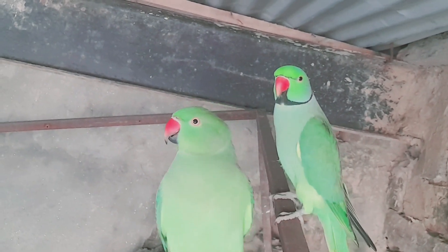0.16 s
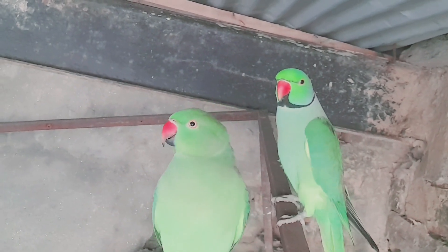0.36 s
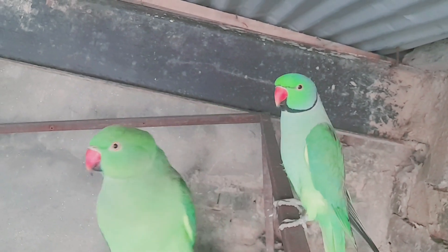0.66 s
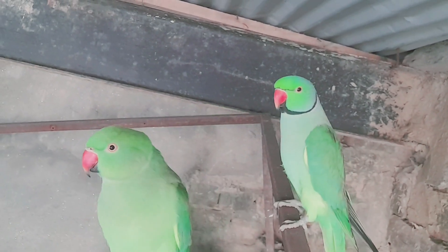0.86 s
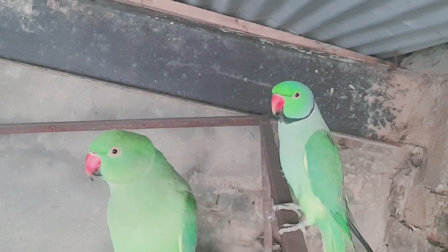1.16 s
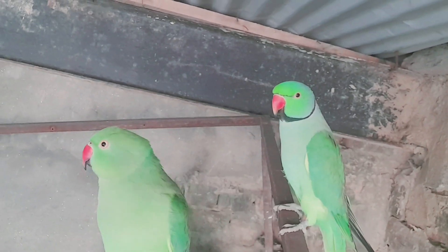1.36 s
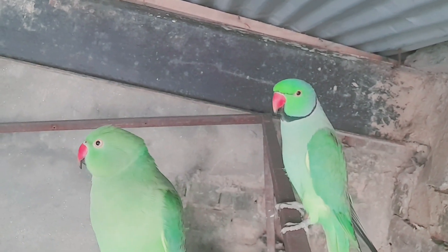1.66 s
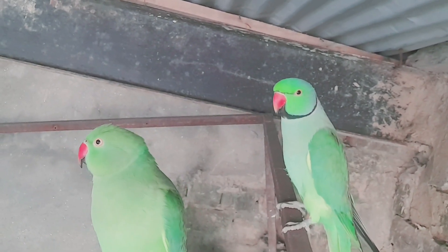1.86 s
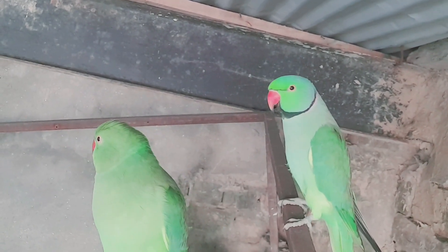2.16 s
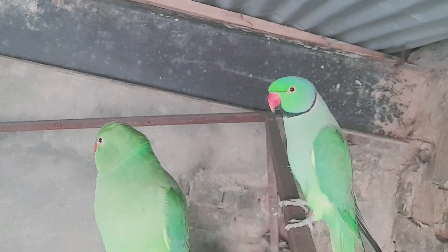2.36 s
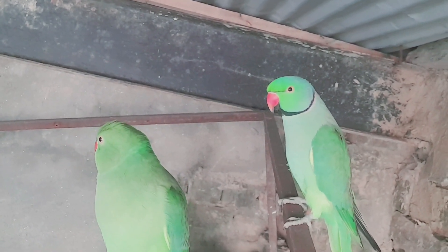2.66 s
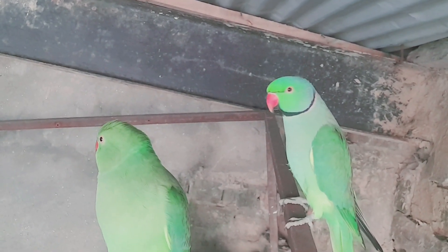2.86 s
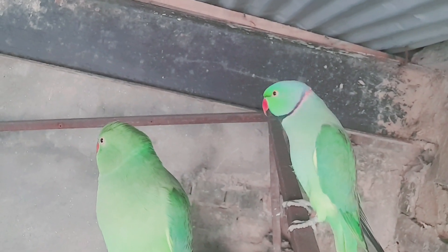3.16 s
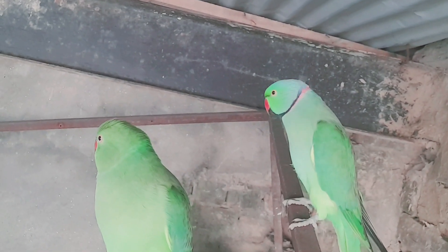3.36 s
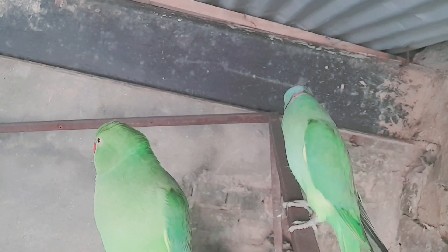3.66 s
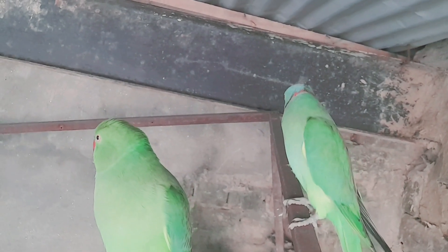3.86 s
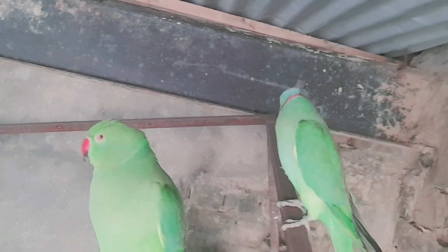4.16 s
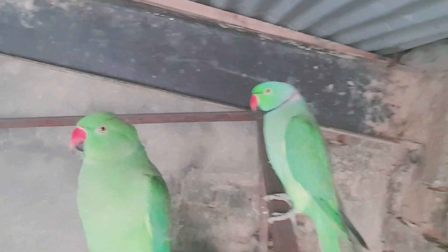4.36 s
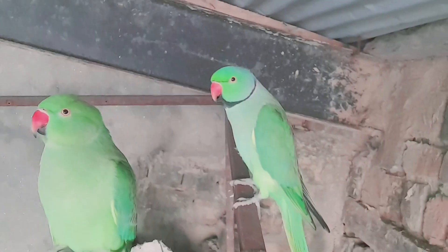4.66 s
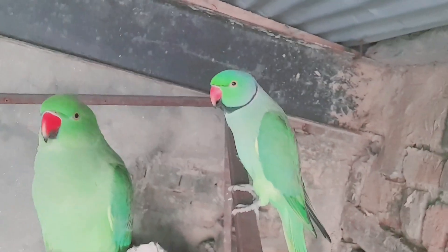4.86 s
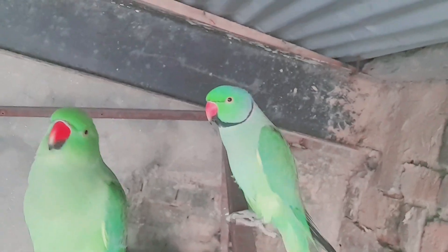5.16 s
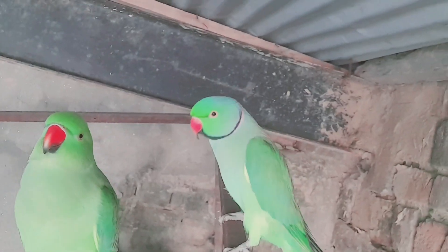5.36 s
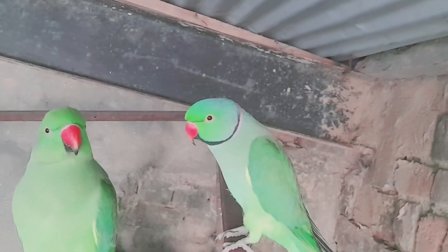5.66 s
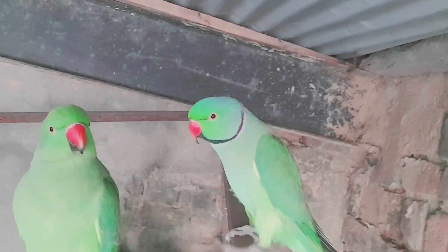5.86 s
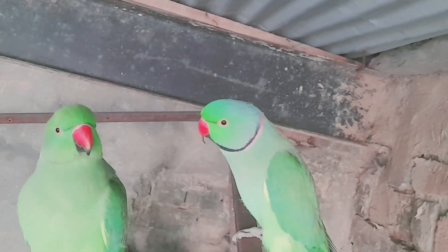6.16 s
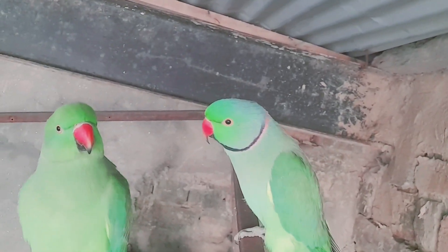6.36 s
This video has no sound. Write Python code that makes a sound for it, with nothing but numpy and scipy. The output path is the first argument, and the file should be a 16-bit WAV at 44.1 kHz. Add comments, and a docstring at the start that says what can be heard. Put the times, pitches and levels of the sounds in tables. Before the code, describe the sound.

Two parakeets in a small brick shelter trade shrill yelps, rasping screeches, squeals and wavering whistles, with beak clicks and a faint rumble.

```python
"""The nearer of two ring-necked parakeets rasps, squeals and whistles in a small brick shelter under a sheet
roof. Each of its calls is a stack of overtones plus breathy noise, shaped by the throat. The farther bird's
yelps, squawks and thin whistle are made the same way but come mostly by way of the walls. Beaks click (short
noise), soft clucks sound at first (dipping tones), and the roof booms once (ringing tones). Faint gliding tones
end a near whistle at first, then come as calls from outside, over a low outdoor rumble made of shaped noise."""
import sys
import numpy as np
from scipy import signal
from scipy.fft import rfft, irfft, next_fast_len
from scipy.io import wavfile
from scipy.ndimage import uniform_filter1d, map_coordinates

SR = 44100
rng = np.random.default_rng(int(sys.argv[2]) if len(sys.argv) > 2 else 0)


def dump_mix(stems):
    """Bounce the given channels to the path in sys.argv[1] as a 16-bit WAV at rate SR."""
    frames = np.atleast_2d(stems).T  # one column per channel
    limited = np.clip(frames, -1, 1)  # hard clip at full scale
    pcm = np.round(limited * 32767).astype(np.int16)
    wavfile.write(sys.argv[1], SR, pcm)


N = 286650  # length in samples
TOP_HZ = 15750  # band limit
# All levels in the tables are set before the final mix.


def amp(db):
    """Decibels to gain."""
    return 10 ** (np.asarray(db) / 20)


def unit(x):
    """Scale to rms 1."""
    return x / np.sqrt(np.mean(x ** 2) + 1e-20)


def along(points, hz):
    """Read (f/Hz, value) points on a log frequency axis."""
    f, v = np.transpose(points)
    return np.interp(np.log(hz + 1), np.log(f + 1), v)


def curves(rows):
    """Turn each column after the time into a smooth curve, one value per sample of the call."""
    s, *cols = np.transpose(rows)
    t = np.arange(s[0], s[-1], 1 / SR)
    return [uniform_filter1d(np.interp(t, s, c), size=300) for c in cols]


def clock(start, end):
    """Seconds into a note, and its progress from 0 to 1."""
    t = np.arange(0, end - start, 1 / SR)
    return t, t / t[-1]


def wobble(rate, size):
    """A smooth random curve with this many random points a second."""
    knots = rng.standard_normal(int(size * rate / SR) + 4)
    return map_coordinates(knots, [np.arange(size) * rate / SR])


def filtered(x, response):
    """Weigh the frequencies of x by a response curve."""
    m = next_fast_len(x.shape[-1] + 8192)
    spectrum = rfft(x, m) * response(np.fft.rfftfreq(m, 1 / SR))
    return irfft(spectrum, m)[..., :x.shape[-1]]


def add(track, s, sound):
    """Mix a sound into a track at a time in seconds."""
    first = round(s * SR)
    sound = sound[max(0, -first):]
    part = track[max(0, first):][:len(sound)]
    part += sound[:len(part)]


def fade(size):
    """A call starts and stops within a few milliseconds."""
    return signal.windows.tukey(size, min(1, .014 * SR / size))


# outdoor noise, weight of each frequency: (f/Hz, level/dB)
AIR = [(20, -14.5), (65, 0.5), (110, 4), (200, -13), (450, -19.5), (900, -34.5), (1600, -33.5),
       (3000, -37.5), (6000, -43), (15500, -40)]
# how loud the outdoor noise is over time: (t/s, level/dB)
RUMBLE = [(0, -60), (1.2, -71.5), (2.2, -66.5), (4, -70), (4.4, -67), (5.398, -58.5), (5.799, -69.5),
          (6.5, -64.5)]


def air():
    """A quiet outdoor rumble, its bass nearly alike in both ears, under a faint hiss that differs."""
    shared, own = rng.standard_normal(N), rng.standard_normal((2, N))
    noise = shared * amp([[-2], [2]])
    noise = noise + filtered(own, lambda hz: along([(120, .15), (1000, 4.6)], hz))
    db = np.interp(np.arange(N) / SR, *np.transpose(RUMBLE))
    return amp(db) * unit(filtered(noise, lambda hz: amp(along(AIR, hz))))


# ringing tones of the roof sheet: (f/Hz, level/dB, time to die by 60 dB t/s)
ROOF = [(65.25, 7.5, 1), (69, -15.5, 1), (94, 4, 0.9), (122, -11, 0.74), (161, 14.5, 0.19),
        (186, -11.5, 0.53)]


def roof(start=2.71, level_db=-39):
    """A soft, deep boom, as of a bumped roof sheet: slightly unsteady tones that die away."""
    out, t = np.zeros(N), np.arange(2 * SR) / SR
    ring = np.zeros(len(t))
    for hz, db, t60 in ROOF:
        ring += amp(db - 60 * t / t60) * np.sin(2 * np.pi * hz * t + .7 * wobble(24, len(t)))
    soft_start = 1 - np.exp(-t / 0.008)
    add(out, start, amp(level_db) * ring * soft_start)
    return out * amp([[-2], [2]])


# how long the echo lasts: (f/Hz, time to die by 60 dB t/s)
WALLS = [(200, 0.15), (1000, 0.27), (3000, 0.25), (7000, 0.31), (15000, 0.47)]


def walls(x, gap=.004):
    """The shelter's blurred echo, after a gap in seconds; each frequency dies at its own speed."""
    hz, t, z = signal.stft(rng.standard_normal((2, SR * 3 // 4)), SR, nperseg=256)
    decay = amp(-60 * t / along(WALLS, hz)[:, None])
    tail = signal.istft(z * decay, SR, nperseg=256)[1]
    tail = np.pad(tail / np.linalg.norm(tail[0]), ((0, 0), (round(abs(gap) * SR), 0)))
    return signal.fftconvolve(x[None], tail, axes=1)[:, :N] * amp([[-2.5], [2.5]])


# loudness balance of the straight path: (f/Hz, left minus right level/dB)
BALANCE_DB = [(200, -3), (950, -7.5), (2400, -9), (6000, -13), (15000, -11.5)]


def direct(x, lead=.00013):
    """The straight path is louder in the right channel; the left one leads by a fraction of a millisecond."""
    def ports(hz):
        """Each channel takes half of the level and time difference."""
        half = amp(along(BALANCE_DB, hz) / 2) * np.exp(1j * np.pi * hz * lead)
        return np.array([half, 1 / half])
    return filtered(x, ports)


# faint gliding tones, at first the end of a near whistle, then calls of other birds outside: (start t/s, length
# t/s, first f/Hz, last f/Hz, level/dB)
GLIDES = [(0, 0.083, 1910, 1850, -32), (5.5, .25, 893, 863, -65), (6.103, 0.092, 2108, 2290, -53),
          (6.12, 0.19, 655, 605, -65), (6.171, 0.22, 1866, 1750, -69), (6.41, .09, 1017, 1000, -68)]
GLIDE_RISE_S, GLIDE_FADE_DB = 0.014, 17


def glides():
    """Bare gliding tones that rise quickly and die away."""
    out = np.zeros(N)
    for start, length, first_hz, last_hz, db in GLIDES:
        t, u = clock(start, start + length)
        pitch = unsteady(first_hz + (last_hz - first_hz) * u, 0.021, rate=267)
        rise = np.minimum(1, t / GLIDE_RISE_S)
        envelope = amp(db - GLIDE_FADE_DB * u ** 2) * rise * fade(len(t))
        add(out, start, envelope * np.sin(2 * np.pi * np.cumsum(pitch) / SR))
    return out


# soft clucks: (t/s, level/dB)
CLUCKS = [(0.061, -22.5), (0.261, -24), (0.467, -26.5), (0.671, -30.5)]


def clucks(end_hz=690, drop_hz=260):
    """Short hollow notes: a tone that swells at once, drops in pitch and dies."""
    out, t = np.zeros(N), np.arange(SR // 10) / SR
    swell = (t / 0.0035) * np.exp(1 - t / 0.0027)
    pitch = end_hz + drop_hz * np.exp(-t / 0.0016)
    note = swell * np.sin(2 * np.pi * np.cumsum(pitch) / SR)
    for s, db in CLUCKS:
        add(out, s, amp(db - 8) * note)
    return out


# beak clicks: (t/s, level/dB)
CLICKS = [(1.95, -44), (2.492, -41), (3.058, -22), (3.885, -39), (4.082, -38), (4.295, -30)]
# tone colour of the beak's horn: (f/Hz, level/dB)
BEAK = [(180, -69), (300, -26.5), (631, -29), (968, -26), (1200, -36.5), (2100, -0.5), (2520, -13),
        (4070, -31), (6050, -22.5), (8560, -21.5), (9760, -35), (14300, -34), (15500, -48.5)]


def clicks():
    """The horn of a beak snaps, with a brief scrape after it: noise that dies fast."""
    out, t = np.zeros(N), np.arange(SR // 10) / SR
    decay = amp(-60 * t / 0.16) + 0.37 * amp(-60 * t / 0.11)
    for s, db in CLICKS:
        horn = unit(filtered(rng.standard_normal(len(t)), lambda hz: amp(along(BEAK, hz))))
        add(out, s, amp(db - 12.5) * horn * decay)
    return out


# tone colour of the throat and open beak: (f/Hz, level/dB)
THROAT = [(300, -8.5), (750, -0.5), (1300, 0.5), (2400, 12), (3400, 6), (4800, 6.5), (6600, 0.5),
          (7500, -8), (8400, -11.5), (10000, -19), (12500, -16.5), (15500, -25.5)]


def syrinx(pitch, throat, dull, even_db, hiss_db, hiss_colour=THROAT, focus_hz=1380):
    """A bird's voice organ: membrane overtones through the throat; dullness weakens those far from the focus."""
    k = np.arange(1, 25)[:, None]  # overtone numbers
    hz = k * pitch
    phase = 2 * np.pi * np.cumsum(pitch) / SR
    # dull is in dB per octave away from the focus
    gain_db = along(throat, hz) - dull * abs(np.log2(hz / focus_hz)) + even_db * (k % 2 == 0)
    gain = amp(gain_db) * (hz < TOP_HZ)
    gain /= np.sqrt(np.sum(gain ** 2, axis=0) / 2) + 1e-9
    # air hisses through the gap once a cycle, and less in a dull voice
    puffs = rng.standard_normal(len(pitch)) * (1 + np.cos(phase))
    hiss = amp(hiss_db - dull) * unit(filtered(puffs, lambda f: amp(along(hiss_colour, f))))
    return (np.sum(gain * np.sin(k * phase), axis=0) + hiss) * fade(len(pitch))


def unsteady(pitch, jitter, rate):
    """The pitch trembles at random; jitter is a share of the pitch."""
    return pitch * np.exp(jitter * wobble(rate, len(pitch)))


def slack(pitch, fall_rate):
    """0 to 1: the membrane loses its tension when the pitch drops fast (fall_rate in e-folds a second)."""
    return np.clip(-np.gradient(np.log(pitch)) * SR / fall_rate, 0, 1)


# tone colour of the farther bird's throat: (f/Hz, level/dB)
FAR_THROAT = [(1200, -8), (2400, -3), (3400, 6.5), (4800, -6), (6800, -12.5), (8500, -20.5), (11000, -28),
              (15500, -41)]


def shrill(pitch, db, even_db, least_hoarse=0):
    """The farther voice: nearly pure when steady, hoarse where it leaps up or slides down."""
    hoarse = np.clip(abs(np.gradient(np.log(pitch))) * SR / 9.5, least_hoarse, 1)
    trembling = unsteady(pitch, .009 + .09 * hoarse ** 2, rate=1600)
    dull = 0.2 * np.maximum(0, -even_db)
    return amp(db) * syrinx(trembling, FAR_THROAT, dull, even_db, hiss_db=-21.5 + 10 * hoarse ** 2)


SCOOP_S, SCOOP_DEPTH = 0.028, .3  # a note leaps up from below: time, share of pitch
ONSET_S, ONSET_DB = 0.048, 15  # and swells


def onset(t):
    """A note scoops up to its pitch and swells: (share of pitch, dB)."""
    scoop = 1 - SCOOP_DEPTH * np.maximum(0, 1 - t / SCOOP_S)
    swell_db = -ONSET_DB * np.maximum(0, 1 - t / ONSET_S)
    return scoop, swell_db


LOW_FALL, LOW_EVEN_DB = 0.37, 8  # share of pitch lost, even overtones at first
LOW_HOARSE = .4  # usual least hoarseness of the low register (0-1)


def low_note(hz, db, u, hoarse=LOW_HOARSE, bend=2.3):
    """The low register, at first strong at the octave, falls ever faster."""
    return shrill(hz * (1 - LOW_FALL * u ** bend), db, LOW_EVEN_DB * (1 - u ** 4), hoarse)


# a thin, wavering whistle from farther off: (t/s, f/Hz, level/dB)
WAVER = [(4.75, 2126, -35), (4.85, 2090, -31), (4.93, 2368, -22.5), (4.99, 2306, -35), (5.05, 2417, -29),
         (5.12, 2709, -23.5), (5.282, 2544, -30.5), (5.344, 2374, -38.5), (5.4, 2641, -27.5),
         (5.44, 2958, -43.5)]


def waver(even_db=-32):
    """One long, almost pure whistle: the farther voice with its even overtones held back."""
    out = np.zeros(N)
    add(out, WAVER[0][0], shrill(*curves(WAVER), even_db))
    return out


# farther bird, the low note alone: (start t/s, end t/s, f/Hz, level/dB)
SQUAWKS = [(4.771, 4.963, 2695, -26), (5.069, 5.28, 2752, -25)]


def squawks(hoarse=.55):
    """Longer calls that stay in the hoarse low register."""
    out = np.zeros(N)
    for start, end, hz, db in SQUAWKS:
        t, u = clock(start, end)
        scoop, swell_db = onset(t)
        add(out, start, low_note(hz * scoop, db + swell_db, u, hoarse))
    return out


# farther bird, a high note that breaks to a lower one: (start t/s, break t/s, end t/s, high note f/Hz,
# sag as a share of pitch, high note level/dB, low note level/dB, even overtones of the high note level/dB)
YELPS = [ (-.035, 0.096, .125, 3050, 0.15, -23, -34, -12.5),
         (0.224, 0.329, .405, 3399, 0.091, -22, -28, -15.5), (0.507, 0.599, .68, 3570, .09, -23, -28, -2.5),
         (0.791, 0.884, .965, 3516, 0.087, -23.5, -28.5, -3.5),
         (3.525, 3.608, 3.685, 3477, 0.1, -22.5, -29, 1.5),
         (4.236, 4.302, 4.35, 3070, -0.055, -28.5, -34.5, -7.5),
         (4.438, 4.601, 4.66, 3167, 0.13, -30.5, -31.5, -4), ]
HIGH_FADE_DB = 2.5  # the high note fades before it breaks
LOW_RATIO = .69  # low note as a share of the high pitch


def yelps(bend=1.8, scoop_even_db=7):
    """Each yelp leaps to a high note that bends, then breaks into the low register."""
    out = np.zeros(N)
    for start, crack, end, hz, sag, high_db, low_db, even_db in YELPS:
        t, u = clock(start, crack)
        scoop, swell_db = onset(t)
        # the even overtones change as the leap ends
        even = np.interp(t, [SCOOP_S * .8, SCOOP_S * 1.2], [scoop_even_db, even_db])
        pitch = hz * scoop * (1 - sag * u ** bend)
        db = high_db + swell_db - HIGH_FADE_DB * u ** 3
        add(out, start, shrill(pitch, db, even))
        add(out, crack, low_note(hz * LOW_RATIO, low_db, clock(crack, end)[1]))
    return out


# a call gives way: length, final share of its pitch, loss
COLLAPSE_S, COLLAPSE_RATIO, COLLAPSE_FADE_DB = .038, 0.31, 14


def gesture(rows, collapses):
    """Pitch and level of a call; in a collapse both give way at the end."""
    s, hz, db = rows[-1]
    ending = (s + COLLAPSE_S, hz * COLLAPSE_RATIO, db - COLLAPSE_FADE_DB)
    return curves(rows + [ending] * collapses)


FULL_VOICE_DB = 1  # this far below its peak a call begins to grow duller
SOFT_DULLING = 1  # dB per octave for each dB below full voice


def softness(db):
    """Extra dullness of a voice that is not pushed, in dB per octave."""
    return SOFT_DULLING * np.maximum(0, db.max() - FULL_VOICE_DB - db)


# clear calls of the near bird, point by point: (t/s, f/Hz, level/dB)
NASAL = [(1.478, 798, -66.5), (1.55, 764.5, -41), (1.62, 793.5, -30), (1.66, 827, -24.5),
         (1.712, 842.2, -24), (1.738, 778, -30.5)]
ARCH = [(2.022, 1476, -47.5), (2.055, 1388, -43.5), (2.09, 1494, -37.5), (2.119, 1745, -36),
        (2.133, 1894, -29), (2.152, 2063, -26), (2.18, 2132, -23), (2.217, 1937, -30.5)]
ARCH_BREAK = [(2.207, 1848, -23.5), (2.24, 1506, -20.5), (2.272, 1222, -30)]
SQUEAL_BREAK = [(3.445, 1857, -30.5), (3.49, 1799, -20), (3.525, 1772, -26), (3.552, 1381, -27.5)]
DIP = [(4.563, 1435, -50.5), (4.61, 1444, -44), (4.7, 1296, -35), (4.745, 1089, -40), (4.778, 1026, -30.5),
       (4.825, 1033, -34), (4.9, 1322, -31), (4.977, 1771, -17.5), (4.992, 1630, -20.5)]
# how each is voiced: (call, dullness at full voice in dB per octave, even overtones at full voice level/dB,
# even overtones when soft level/dB, ends in a collapse)
CLEAR_CALLS = [(NASAL, -1.2, 3.2, 8, True), (ARCH, 0.48, -24, 0.87, False), (ARCH_BREAK, 2.5, 1.3, 4, True),
               (SQUEAL_BREAK, 1.1, 17, 6, True), (DIP, 7, -5, -14.5, False)]


def whistles():
    """Clean calls that brighten as they swell and turn rough where the pitch drops fast."""
    out = np.zeros(N)
    for rows, dull, full_even_db, soft_even_db, collapses in CLEAR_CALLS:
        pitch, db = gesture(rows, collapses)
        loose = slack(pitch, fall_rate=24)
        trembling = unsteady(pitch, .006 + .1 * loose ** 2, rate=1300)
        soft = softness(db) * (1 - loose)
        # the balance of odd and even overtones shifts as the voice is pushed
        even = soft_even_db + (full_even_db - soft_even_db) * np.exp(-soft / 11)
        even = (1 - loose) * even
        voice = syrinx(trembling, THROAT, dull + soft, even, hiss_db=-35 + 40 * loose)
        add(out, rows[0][0], amp(db) * voice)
    return out


# high squeals of the near bird:
# (start t/s, loudest t/s, end t/s, f/Hz, level/dB, even overtones level/dB)
SQUEALS = [(2.988, 2.987, 3.095, 2499, -20.5, -9), (3.324, 3.373, 3.505, 2454, -16.5, -1.5)]
SQUEAL_BOW = 0.033  # the ends lie flat by this share of the pitch
SQUEAL_SWELL_DB, SQUEAL_FADE_DB = 5, 16  # and are softer
SQUEAL_DULL = 1.9  # dB per octave


def squeals(jitter=0.015, shimmer_db=3):
    """High, slightly bowed notes that quiver in pitch and loudness and fade."""
    out = np.zeros(N)
    for start, loudest, end, hz, level_db, even_db in SQUEALS:
        t, u = clock(start, end)
        pitch = unsteady(hz * (1 - SQUEAL_BOW * (2 * u - 1) ** 2), jitter, rate=1000)
        rise = np.interp(start + t, [start, loudest], [1, 0])
        fall = np.interp(start + t, [loudest, end], [0, 1])
        quiver_db = shimmer_db * np.tanh(wobble(130, len(t)))
        db = level_db - SQUEAL_SWELL_DB * rise - SQUEAL_FADE_DB * fall ** 2 + quiver_db
        add(out, start, amp(db) * syrinx(pitch, THROAT, SQUEAL_DULL, even_db, hiss_db=-30))
    return out


# harsh calls of the near bird, point by point: (t/s, f/Hz, level/dB)
SCREECH = [(.865, 812, -43), (.92, 949, -31.5), (.955, 1135, -25), (1.0, 1203, -17.5), (1.15, 1241, -21.5),
           (1.178, 1245, -42.5)]
GROWL = [(2.545, 496.5, -60), (2.57, 556.3, -46.5), (2.62, 626, -39), (2.7, 708, -30.5), (2.85, 867, -25),
         (2.9, 1028, -25), (2.945, 1273, -21.5), (2.97, 1660, -26), (3.0, 1850, -21)]
SNARL = [(3.07, 676.7, -37), (3.1, 956, -40), (3.13, 1125, -41), (3.205, 1210, -25), (3.25, 1190, -22.5),
         (3.3, 1100, -23.5)]
MUTTER = [(4.135, 751, -65.5), (4.19, 778, -53.5), (4.225, 943, -60), (4.258, 1409, -49)]
# tone colour of the throat in a screech, in a growl and in the other harsh calls: (f/Hz, level/dB)
SCREECH_THROAT = [(150, -77.5), (250, -47.5), (882, -30.5), (995, -15.5), (1700, -12), (1890, -3),
                  (2440, -6), (2900, 2), (3280, -13), (5600, -20), (7000, -26.5), (7900, -47), (15500, -36)]
GROWL_THROAT = [(150, -58), (250, -22), (573, -29.5), (768, -12.5), (1250, -24.5), (1920, -5), (2490, -1),
                (3760, -13.5), (4790, -13), (5890, -20), (7000, -19), (8920, -34), (9720, -40.5),
                (10800, -32.5), (15500, -45)]
HARSH_THROAT = [(120, -48.5), (400, -26.5), (750, -6.5), (1300, -5), (1700, 2.5), (2500, 5), (3050, 5.5),
                (3600, -2.5), (4800, -1.5), (7000, -9.5), (8600, -18.5), (10000, -27.5), (12500, -22.5),
                (15500, -32.5)]
# how each is voiced: (call, throat, dullness at full voice in dB per octave, flap sets in t/s,
# flutter as a share of pitch, jitter as a share of pitch, ends in a collapse)
HARSH_CALLS = [(SCREECH, SCREECH_THROAT, 0.8, .86, 0.23, 0.034, False),
               (GROWL, GROWL_THROAT, -0.85, 2.54, .015, 0.067, False),
               (SNARL, HARSH_THROAT, 2.6, 3.165, .135, 0.016, True),
               (MUTTER, HARSH_THROAT, 1.5, 3.5, .02, 0.083, False)]
FLAP_HZ, FLAP_RISE_S = 118, .045  # middle rate of the flap, and how long it takes to build up
TORN_JITTER = .07  # a voice this rough stays bright even when fairly soft
# in a torn voice the second side of the syrinx sounds too: gap as a share of pitch, share of the power
TWIN_DETUNE, TWIN_SHARE = .055, .45


def rasps(second_db=1.0, shimmer_db=40, collapse_jitter=0.11):
    """A flap of the syrinx swings pitch and loudness together, and the tone tears into two rough strands."""
    out = np.zeros(N)
    for rows, throat, dull, flap_s, depth, rough, collapses in HARSH_CALLS:
        pitch, db = gesture(rows, collapses)
        t = rows[0][0] + np.arange(len(db)) / SR
        flutter = np.clip(depth, 0, .6) * np.clip((t - flap_s) / FLAP_RISE_S, 0, 1)
        jitter = rough + collapse_jitter * slack(pitch, fall_rate=43)
        soft = softness(db) * np.clip(1 - jitter / TORN_JITTER, .15, 1)
        flap_rate = FLAP_HZ * (1 + .012 * wobble(60, len(db)))
        flap = np.sin(2 * np.pi * np.cumsum(flap_rate) / SR)
        swing = flutter * flap
        throb_db = 24 * (swing - flutter / 2)
        # the rougher the voice, the stronger the second strand
        twin = np.clip(TWIN_SHARE * (rough / TORN_JITTER) ** 2, 0, .5)
        strands = ((1 - twin, -TWIN_DETUNE * twin), (twin, TWIN_DETUNE * (1 - twin)))
        for share, detune in strands:
            swung = unsteady(pitch * (1 + swing + detune), jitter, rate=650)
            level = db + throb_db + shimmer_db * jitter * np.tanh(wobble(260, len(db)))
            # each push of the flap also brightens the tone
            dullness = dull + soft - 8 * swing
            tone = syrinx(swung, throat, dullness, second_db, hiss_db=-20, hiss_colour=throat)
            add(out, t[0], np.sqrt(share) * amp(level) * tone)
    return out


def scene():
    """Near sounds are mostly dry, far ones mostly echo."""
    near = whistles() + squeals() + rasps() + clicks() + clucks()
    far = yelps() + squawks() + waver() + glides()
    near_heard = amp(4.0) * direct(near) + amp(-4.5) * walls(near)
    far_heard = amp(-6.5) * direct(far) + amp(0.5) * walls(far)
    return near_heard + far_heard + roof() + air()


def record(dry):
    """The loudest peaks are rounded off, and nothing is kept above the band limit."""
    rounded = dry / (1 + abs(dry / .95) ** 8) ** (1 / 8)
    return filtered(rounded, lambda hz: hz < TOP_HZ)


dry = scene()
out = record(dry)
dump_mix(out)
```